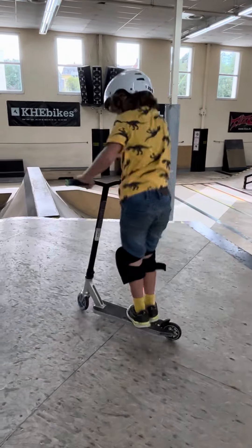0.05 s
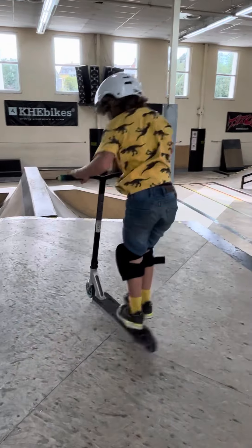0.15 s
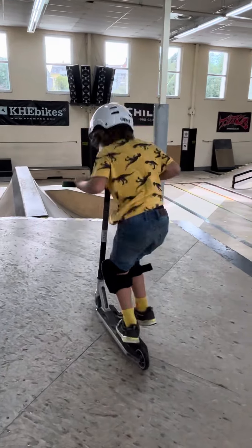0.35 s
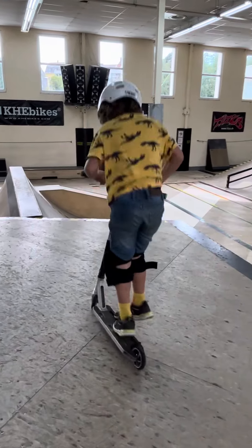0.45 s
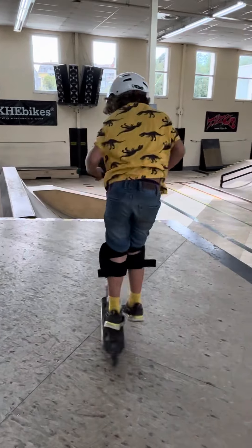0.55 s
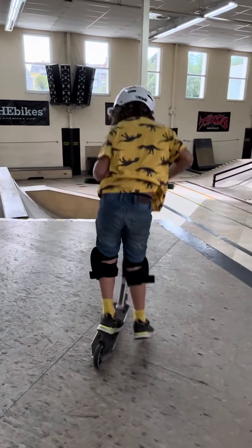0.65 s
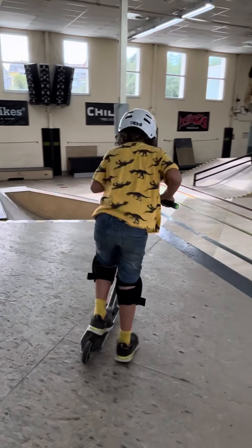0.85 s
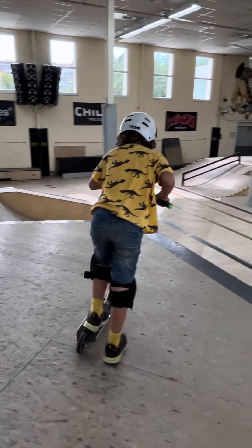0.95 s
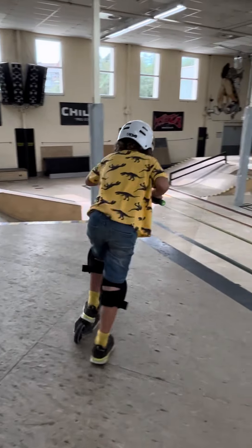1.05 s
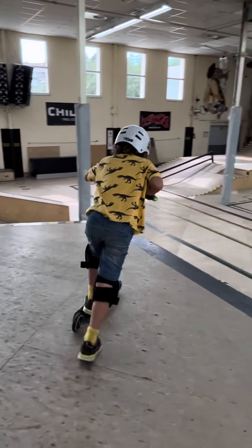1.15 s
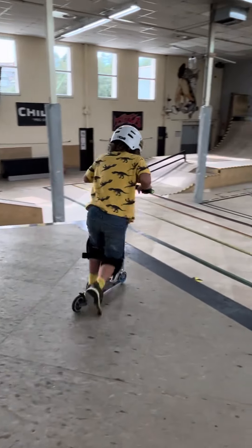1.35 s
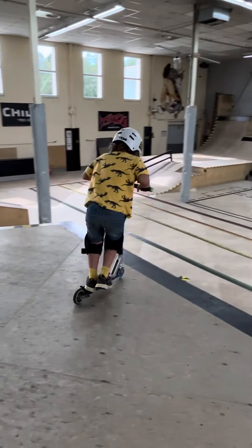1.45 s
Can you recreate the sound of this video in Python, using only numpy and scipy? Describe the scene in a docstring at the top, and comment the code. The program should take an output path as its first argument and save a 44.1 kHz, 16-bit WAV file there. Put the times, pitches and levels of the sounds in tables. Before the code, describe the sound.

A kick scooter clicks lightly, then lands close by on a hollow wooden deck at about 0.2 seconds with a double boom and a rattle. Its wheels rumble briefly. Around 0.6 to 0.8 seconds, wheels and a foot hit again, with the sharpest knock near 0.7. The scooter then rolls on more quietly until 1.5 seconds, rumbling and whirring over faint grit, while the large hall reverberates.

```python
"""Kick scooter hops in a skatepark hall

A scooter is hopped round on a hollow wooden deck, then pushed away. Wheels and the rider's foot
land in two pairs of blows: the deck booms, wheels and frame knock and rattle. Between and after
the landings the wheels rumble, whirr and crush grit on the boards, and the large hall rings on."""
import sys
import numpy as np
from scipy import signal
from scipy.fft import rfft, irfft
from scipy.io import wavfile

SR = 44100
rng = np.random.default_rng(int(sys.argv[2]) if len(sys.argv) > 2 else 0)


def log_audio(samples):
    """Write samples as a 16-bit WAV file to the path given in sys.argv[1]."""
    # one column per channel
    frames = np.atleast_2d(samples).T
    # limit to full scale, then quantise
    limited = np.clip(frames, -1, 1)
    pcm = np.round(limited * 32767).astype(np.int16)
    wavfile.write(sys.argv[1], SR, pcm)


N = 66150
TIME = np.arange(N) / SR
EDGES = np.concatenate([np.geomspace(22, 4000, 20)[:-1], np.geomspace(4000, 17000, 10)])  # bands, Hz
CENTRES = np.sqrt(EDGES[1:] * EDGES[:-1])

# the boards' deep rumble under the wheels: (time [s], level [dB])
ROLL_LEVEL = [(0, -44), (.19, -50.5), (.27, -28), (.39, -19.5), (.48, -29), (.55, -26.5), (.68, -28.5),
              (.8, -17.5), (.92, -26.5), (1.02, -27.5), (1.2, -31), (1.34, -30.5), (1.41, -40), (1.5, -28)]


def from_db(db):
    """Decibels to gain."""
    return 10 ** (np.asarray(db) / 20)


def rms_one(x):
    """Scale to an rms of 1."""
    return x / np.sqrt(np.mean(x ** 2) + 1e-20)


def at_hz(points, hz, axis=1):
    """Read a column of a table on a log-frequency axis."""
    table = np.array(points)
    return np.interp(np.log(hz), np.log(table[:, 0]), table[:, axis])


def band_gains(spectrum):
    """Gain of each band for a spectral density; total power 1."""
    gains = from_db(at_hz(spectrum, CENTRES)) * np.sqrt(CENTRES)
    return gains / np.linalg.norm(gains)


def noise_bands():
    """Unrelated noise in each band, rms 1: bands x N."""
    filters = [signal.butter(2, band, "band", fs=SR, output="sos") for band in zip(EDGES, EDGES[1:])]
    return np.array([rms_one(signal.sosfilt(sos, rng.standard_normal(N + SR // 2))[-N:])
                     for sos in filters])


def diffuse_bands():
    """Stereo noise bands, centred in the bass and wide in the treble: 2 x bands x N."""
    # left-right likeness of diffuse sound: (frequency [Hz], correlation [0-1])
    likeness = [(60, 1), (125, 1), (250, 0.97), (500, 0.36), (1000, 0.19), (2000, 0.07), (8000, 0.04)]
    alike = at_hz(likeness, CENTRES)[:, None]
    mid = np.sqrt((1 + alike) / 2) * noise_bands()
    side = np.sqrt((1 - alike) / 2) * noise_bands()
    return np.array([mid + side, mid - side])


def struck(modes, start, gains):
    """Decaying sines of alternating polarity, set off at one moment."""
    t = TIME[:SR // 2]
    ring = sum((-1) ** k * gain * from_db(db - 60 * t / t60) * np.sin(2 * np.pi * hz * t)
               for k, ((hz, db, t60), gain) in enumerate(zip(modes, gains)))
    return np.interp(TIME - start, t, ring, left=0, right=0)


def hall_air():
    """The steady air of the hall, a faint bed of room tone."""
    # the air as heard, with narrow hollows in the treble: (frequency [Hz], relative density [dB])
    colour = [(30, -21.5), (150, -5.5), (350, -4.5), (600, -6), (1100, -10.5), (2000, -17), (4600, -18.5),
              (6000, -47.5), (7800, -19), (10300, -52.5), (12500, -28), (16000, -54)]
    return from_db(-54.5) * band_gains(colour) @ diffuse_bands()


def hall(x):
    """Early reflections from the ramps, then a tail that lingers longest in the bass."""
    # the hall's reverb tail: (frequency [Hz], level [dB], t60 [s])
    tail = [(50, -18.5, 2.9), (114, -12, 1.2), (263, -11.5, 0.48), (503, -5.5, 0.73), (1020, -15, 1.18),
            (2000, -14, .8), (5000, -13.5, 0.93), (13000, -20, 0.55)]
    onset_s, early_db, early_t60_s = 0.0068, 4.5, 0.071
    onset = 1 - np.exp(-TIME / onset_s)
    t60 = at_hz(tail, CENTRES, axis=2)[:, None]
    late = from_db(-60 * TIME / t60) * onset
    late /= np.linalg.norm(late, axis=1, keepdims=True)
    early = from_db(-60 * TIME / early_t60_s) * onset
    early *= from_db(early_db) / np.linalg.norm(early)
    low_cut = 1 / np.hypot(1, (300 / CENTRES[:, None]) ** 2)  # the ramps scatter little below 300 Hz
    gains = from_db(at_hz(tail, CENTRES)) * np.sqrt(2 * np.diff(EDGES) / SR)
    response = gains @ (diffuse_bands() * (late + early * low_cut))
    return signal.fftconvolve(response, x[None], axes=1)[:, :N]


def grit():
    """The wheels crush specks of dirt: tiny random ticks that loosely follow the rumble."""
    # the grit as heard, with narrow hollows in the treble: (frequency [Hz], relative density [dB])
    colour = [(300, 15.5), (1000, -12), (2000, 11.5), (4500, -7), (6000, -31), (7600, -0.5), (10300, -41),
              (12500, -1.5), (16000, -23.5)]
    level_db, specks_per_s, grain_s, spread_db, follow = -64.5, 1500, 0.0036, 7, 0.25
    hits = rng.random(N) < specks_per_s / SR
    specks = hits * from_db(spread_db * rng.standard_normal(N).clip(-2, 2))
    grains = signal.lfilter([1], [1, -np.exp(-1 / (grain_s * SR))], specks + 1e-18)
    crunch = rms_one(grains * (band_gains(colour) @ diffuse_bands()))
    roll_db = np.interp(TIME, *np.transpose(ROLL_LEVEL))
    return from_db(level_db + follow * (roll_db - roll_db.mean())) * crunch


def whirr():
    """The hard tyres run over the rough surface."""
    # the whirr's envelope, rising again at the push-off: (time [s], level [dB])
    envelope = [(0, -56), (.1, -50), (.19, -47), (.35, -44), (.55, -63.5), (.85, -47), (1.1, -49),
                (1.3, -47), (1.41, -52), (1.5, -47.5)]
    # the whirr as heard, with a narrow hollow in the treble: (frequency [Hz], relative density [dB])
    colour = [(60, -8.5), (160, 0), (310, 2.5), (450, -6.5), (1000, -14), (2000, -21), (4500, -31.5),
              (6000, -66), (8000, -49.5), (16000, -62.5)]
    return from_db(np.interp(TIME, *np.transpose(envelope))) * (band_gains(colour) @ diffuse_bands())


def rumble():
    """The wheels shake the boards, unevenly, as hard as they are loaded."""
    # colour of the rumble: (frequency [Hz], relative density [dB])
    colour = [(25, -19.5), (40, -4.5), (58, 2.5), (85, -3), (120, -5.5), (170, -9), (250, -19), (350, -22),
              (500, -50), (1000, -45), (3000, -100.5)]
    flicker_db, flicker_times = 1.5, np.linspace(0, TIME[-1], 30)
    wander = rng.standard_normal((len(CENTRES), len(flicker_times)))
    flicker = np.array([np.interp(TIME, flicker_times, row) for row in wander])
    bands = diffuse_bands() * from_db(flicker_db * flicker)
    return from_db(np.interp(TIME, *np.transpose(ROLL_LEVEL))) * rms_one(band_gains(colour) @ bands)


def at_microphones(x):
    """Give a close sound its level and phase difference between left and right."""
    # stereo image of the knocks: (frequency [Hz], left minus right [dB], left phase lead [rad])
    image = [(100, 0, 0), (380, 1.5, -.2), (700, -1.5, -.45), (1300, -2.8, -.25), (2400, -1.5, 1.0),
             (4400, -2, 1.3), (7300, .2, 5.8), (11500, 0, 11.7), (15500, 0, 16.6)]
    hz = np.maximum(np.fft.rfftfreq(2 * N, 1 / SR), 1)
    left = from_db(at_hz(image, hz) / 2) * np.exp(.5j * at_hz(image, hz, axis=2))
    spectrum = rfft(np.concatenate([x, x[::-1]]))
    return irfft(spectrum * np.array([left, 1 / left]))[:, :N]


def contact_colour(hz, tilt, stressed_hz, top_hz):
    """A contact tilts the spectrum, stresses one region of it and, being soft, loses the top."""
    pivot_hz, stress_db, stress_octaves = 970, 9.5, 0.23
    slope_db = tilt * np.log2(hz / pivot_hz).clip(-1)
    bump_db = stress_db * np.exp(-(np.log2(hz / stressed_hz) / stress_octaves) ** 2)
    return from_db(slope_db + bump_db) / np.hypot(1, (hz / top_hz) ** 3)


def knocks():
    """Each knock is a brief gritty crack and a ring of the frame, with its own brightness."""
    # contacts of wheels and frame: (time [s], relative level [dB], tilt [dB/octave],
    # crack decay [s], stressed pitch [Hz], top edge [Hz])
    contacts = [(.087, -41.5, 4, 0.0039, 3050, 6000), (0.097, -39.5, 2, 0.0034, 1760, 12000),
                (0.186, -53.5, 7, .002, 4600, 9100), (0.198, -29.5, -3.5, 0.009, 1000, 8050),
                (.201, -22.5, 4.5, .002, 1750, 2000), (0.204, -45.5, 3.5, .003, 4800, 8000),
                (.211, -57, 9.5, .002, 4800, 8000), (0.225, -34.5, -5, 0.0029, 1150, 4870),
                (.246, -24, -2, 0.0089, 850, 8200), (.251, -21.5, 3.5, 0.0029, 2680, 14800),
                (0.27, -40, -6, 0.0036, 5100, 11130), (0.278, -28.5, -13.5, 0.0026, 1250, 7100),
                (.285, -33, -11, 0.0045, 3400, 7950), (0.319, -36, -4.5, 0.0034, 1133, 6060),
                (0.587, -50, 1.5, .014, 11200, 12000), (0.591, -27, -8, .0015, 1586, 3500),
                (0.605, -27, -2.5, .004, 1265, 7570), (.689, -39.5, 5, 0.0025, 1740, 7000),
                (0.696, -25, -5.5, .003, 650, 5970), (0.701, -15, .5, .002, 852, 5970),
                (0.728, -25.5, -2.5, 0.0059, 680, 6030), (0.744, -24, -6, 0.0034, 1100, 6000),
                (.777, -26.5, 0.5, 0.0018, 1387, 5500), (.936, -61.5, 4.5, 0.0018, 8200, 13100),
                (.974, -39.5, -0.5, 0.0015, 1060, 5954), (1.43, -47.5, 3, 0.0036, 1600, 6070),
                (1.477, -53, 4, .006, 900, 10600), (1.490, -44.5, 2.5, 0.0075, 1000, 14500)]
    # modes of the scooter: (frequency [Hz], relative level [dB], t60 [s])
    frame_modes = [(516, -18, 0.026), (731, -7, 0.03), (939.6, -8, .04), (1035, -7, 0.046),
                   (1116, -11.5, 0.077), (1190, -29, .03), (1573, -11.5, 0.026), (1894, -8, 0.013),
                   (2244, -20, 0.026), (2520, -18.5, 0.02), (3220, -18, .03), (3840, -27, 0.018),
                   (5070, -14.5, 0.018), (7700, -22.5, 0.043)]
    # the crack as heard, with narrow hollows in the treble: (frequency [Hz], relative density [dB])
    crack_colour = [(200, 9), (400, 8), (600, -7), (1000, 0.5), (1400, -4.5), (2200, -12), (5000, -12),
                    (6000, -30), (7500, -12.5), (10300, -31.5), (13000, -14), (16000, -29.5)]
    crack_rise_s, crack_db, frame_db = 0.00073, 1, -2.5
    mode_hz = np.array(frame_modes)[:, 0]
    noise = noise_bands() * band_gains(crack_colour)[:, None]
    out = np.zeros(N)
    for start, db, tilt, decay_s, stressed_hz, top_hz in contacts:
        age = np.maximum(TIME - start, 0)
        envelope = (1 - np.exp(-age / crack_rise_s)) * np.exp(-np.minimum(age / decay_s, 20))
        crack = contact_colour(CENTRES, tilt, stressed_hz, top_hz) @ noise * envelope
        scatter = from_db(rng.normal(0, 1, len(frame_modes)))
        ring = struck(frame_modes, start, contact_colour(mode_hz, tilt, stressed_hz, top_hz) * scatter)
        out += from_db(db) * (from_db(crack_db) * crack + from_db(frame_db) * ring)
    return out


def deck():
    """Under each blow the board swells into a short boom; heavy blows also ring the whole deck."""
    # blows on the deck: (time [s], boom level [dB], pitch of that spot [Hz], swell [s],
    # ring level [dB], ring tilt [dB/octave])
    blows = [(0.201, -4, 102.2, 0.016, -14.5, 1), (.250, -3, 72, 0.017, -8.5, 1),
             (.286, -9.5, 126.6, 0.012, -28, 0), (0.309, -10, 76, 0.011, -28.5, 3),
             (.455, -17, 62.6, 0.013, -33, 6.5), (.589, -5.5, 96.1, 0.017, -25.5, -0.5),
             (.705, -1, 106.5, 0.0069, -8, -0.5), (.747, -4, 83.8, 0.0095, -30, -3),
             (0.895, -21, 57, 0.0099, -37.5, 0), (1.196, -17.5, 71.7, 0.02, -37.5, -3.5),
             (1.321, -25, 62.8, 0.0079, -34.5, -6)]
    # modes of the hollow deck: (frequency [Hz], relative level [dB], t60 [s])
    deck_modes = [(55.2, -3, .27), (140, -5.5, 0.088), (144.8, 9, 0.11), (191, -4.5, 0.11),
                  (216.6, -8, 0.21), (249.3, -7, 0.12), (304.7, -12, 0.097), (336, -8, 0.095),
                  (374, -12, 0.1)]
    pivot_hz, ring_rise_s = 198, 0.0033
    octaves = np.log2(np.array(deck_modes)[:, 0] / pivot_hz)
    out = np.zeros(N)
    for start, boom_db, hz, swell_s, ring_db, tilt in blows:
        age = np.maximum(TIME - start, 0)
        envelope = (age / swell_s) ** 2 * np.exp(2 - 2 * age / swell_s)
        boom = envelope * np.sin(2 * np.pi * hz * age)
        ring = struck(deck_modes, start, from_db(tilt * octaves)) * (1 - np.exp(-age / ring_rise_s))
        out += from_db(boom_db) * boom + from_db(ring_db) * ring
    return out


def scene():
    """Close booms and knocks excite the hall, over rolling wheels and room tone."""
    boom, clack, air = deck(), knocks(), hall_air()
    return boom + at_microphones(clack) + hall(boom + clack) + rumble() + whirr() + grit() + air


def record(dry):
    """The highest peaks are rounded and the top is cut."""
    ceiling, cutoff_hz = .95, 16500
    rounded = dry / (1 + (dry / ceiling) ** 6) ** (1 / 6)
    return signal.sosfilt(signal.cheby2(12, 70, cutoff_hz, fs=SR, output="sos"), rounded)


dry = scene()
out = record(dry)
log_audio(out)
```